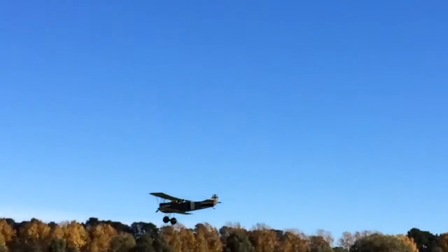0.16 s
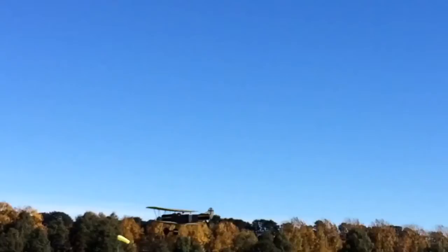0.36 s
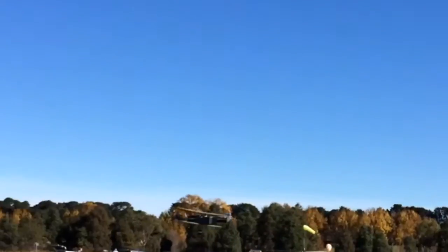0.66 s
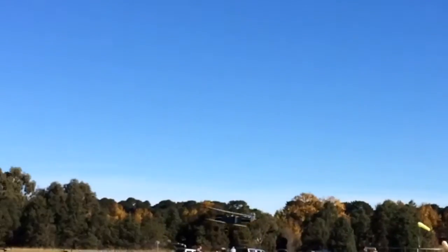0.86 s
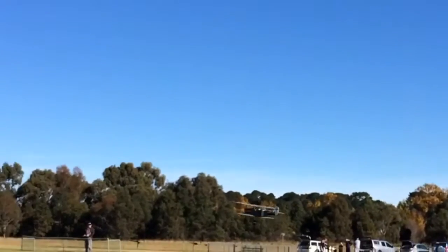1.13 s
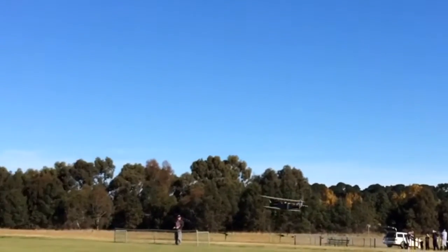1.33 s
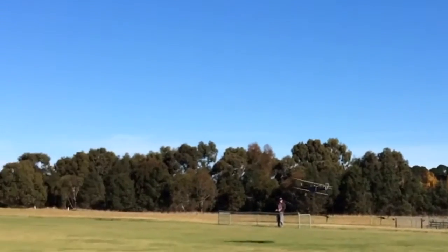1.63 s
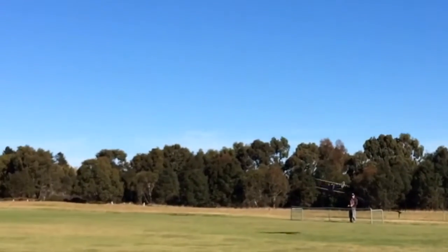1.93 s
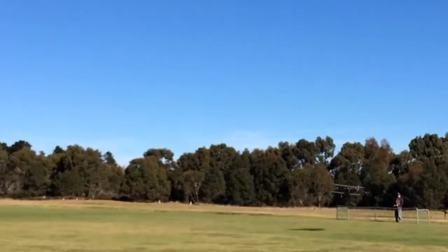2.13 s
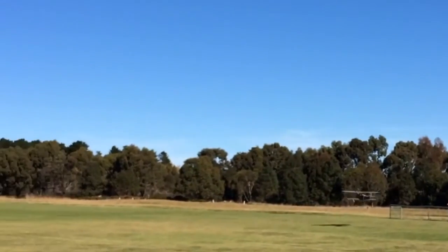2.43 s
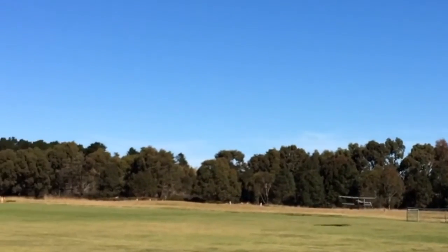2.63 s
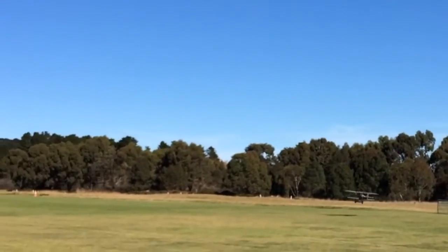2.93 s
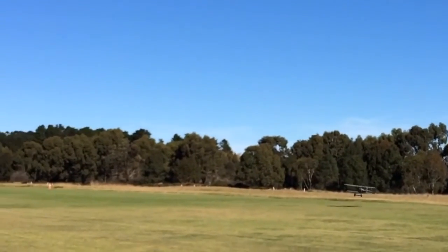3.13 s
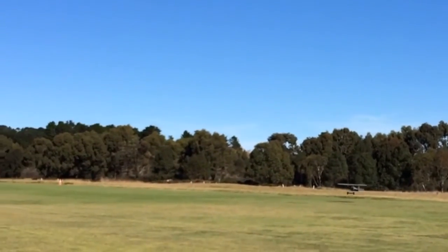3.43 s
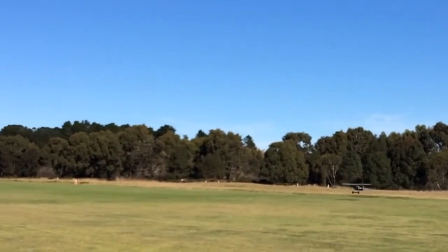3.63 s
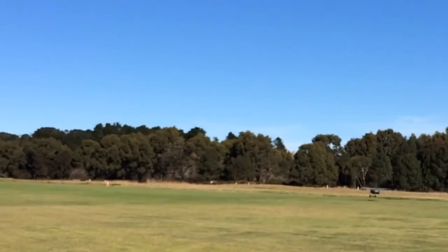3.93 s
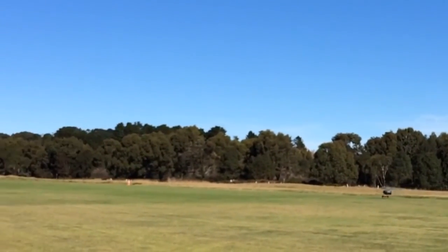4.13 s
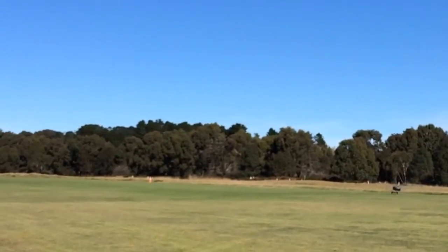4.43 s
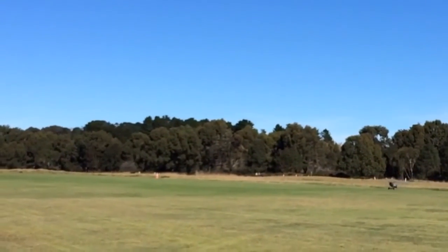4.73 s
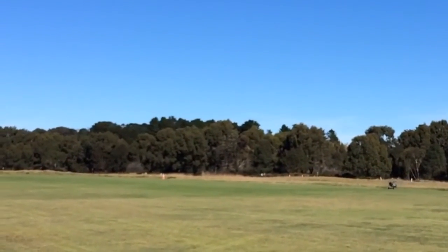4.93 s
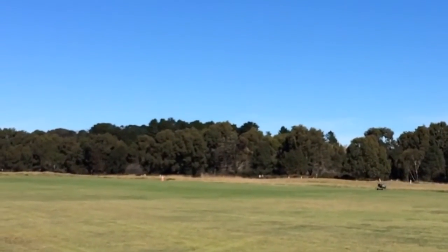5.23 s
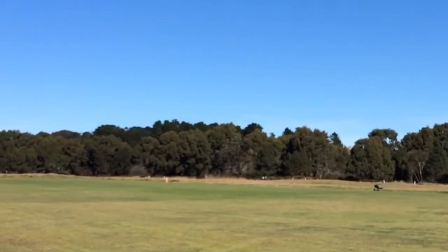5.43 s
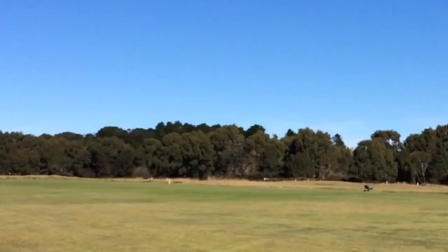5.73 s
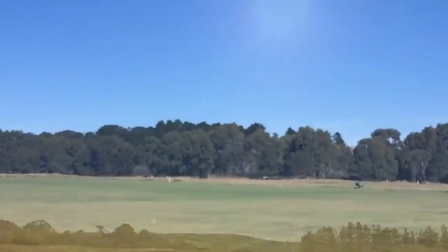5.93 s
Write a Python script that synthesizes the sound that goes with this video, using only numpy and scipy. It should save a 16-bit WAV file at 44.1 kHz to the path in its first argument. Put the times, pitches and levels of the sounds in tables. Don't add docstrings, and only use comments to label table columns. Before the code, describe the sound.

A small electric model biplane hisses and whines past over an open field while a nearby little engine putters unevenly with a ticking tin rattle.

```python
import sys
import numpy as np
from scipy import signal
from scipy.io import wavfile

SR = 44100
rng = np.random.default_rng(int(sys.argv[2]) if len(sys.argv) > 2 else 0)


def volts_from_db(level):
    exponent = np.asarray(level, float) / 20
    return 10 ** exponent


def transcribe(u):
    v = np.clip(np.atleast_2d(u).T, -1, 1)
    q = np.round(v * 32767).astype(np.int16)
    wavfile.write(sys.argv[1], SR, q)


N = 267246
TIME_S = np.arange(N) / SR


def rms_one(x):
    return x / np.sqrt(np.mean(x ** 2) + 1e-20)


def in_time(rows):
    s, *columns = np.transpose(rows)
    return [np.interp(TIME_S, s, column) for column in columns]


def swells(rows):
    return sum(volts_from_db(db) * np.exp(-((TIME_S - s) / spread) ** 2) for s, db, spread in rows)


def drift(rate):
    r = np.exp(-80 * np.pi * rate / SR)
    white = rng.standard_normal(N // 40 + 2002)
    slow = signal.lfilter([1], [1, -2 * r, r * r], white)[2000:]
    return np.interp(np.arange(N) / 40, np.arange(len(slow)), rms_one(slow))


def ring(clicks, hz, t60):
    r = volts_from_db(-60 / (t60 * SR))
    w = 2 * np.pi * hz / SR
    return signal.lfilter([0, np.sin(w)], [1, -2 * r * np.cos(w), r * r], clicks + 1e-18)


def tone(hz):
    cycles = np.cumsum(np.broadcast_to(hz, N)) / SR
    return np.sqrt(2) * np.sin(2 * np.pi * (cycles + rng.random()))


def swell_and_die(t, rise):
    return (t / rise) ** 2 * np.exp(2 - 2 * t / rise)


def burst(length_s, hz, rise):
    t = np.arange(int(length_s * SR)) / SR
    return swell_and_die(t, rise) * np.cos(2 * np.pi * hz * (t - rise))


def add(out, s, wave):
    i = round(s * SR)
    out[i:i + len(wave)] += wave[:N - i]


def band_pass(x, low, high, order=2):
    return signal.sosfilt(signal.butter(order, [low, high], "band", fs=SR, output="sos"), x)


def coloured_noise(spectrum, patchy_db, flicker, shared):
    hz_at, db_at = np.transpose(spectrum)
    bands = round(3 * np.log2(hz_at[-1] / hz_at[0]))
    edges = np.geomspace(hz_at[0], min(hz_at[-1], .45 * SR), bands + 1)
    out, together = 0, drift(0.16)
    white = rng.standard_normal((2, N))
    for k, (low, high) in enumerate(zip(edges, edges[1:])):
        level_db = np.interp(np.log(low * high) / 2, np.log(hz_at), db_at)
        wander_db = patchy_db * (shared * together + drift(flicker))
        out = out + volts_from_db(level_db + wander_db) * band_pass(white[k % 2], low, high)
    return rms_one(out)


# t/s, level/dB
WIND = [(0.0, -46), (0.32, -50), (0.72, -55), (1.3, -53), (1.78, -49), (2.3, -50), (2.55, -45), (2.8, -48),
        (3.09, -52), (3.4, -47), (4.5, -49), (5.3, -45), (5.85, -42), (5.95, -41), (6.06, -42)]
# f/Hz, level/dB per Hz
WIND_COLOUR = [(18, -16), (40, -7), (70, -2), (120, -3), (200, -4), (260, -18.5), (320, -24.5), (450, -23)]


def wind():
    wind_db, = in_time(WIND)
    return volts_from_db(wind_db - 5.0) * coloured_noise(WIND_COLOUR, patchy_db=2.5, flicker=7.5, shared=0.3)


# t/s, level/dB, ground-echo dip or lift/dB
AIR = [(0.0, -55, 2), (0.49, -56.5, -6), (0.67, -55, -5), (.88, -55.5, -9), (1.05, -57, -3),
       (1.35, -57, -0.5), (3.39, -59, 3.5), (4.3, -58.5, 0.5), (4.8, -57.5, 3), (5.4, -57, -3),
       (5.92, -59, -2), (6.06, -54, 0.5)]
# f/Hz, level/dB per Hz
AIR_COLOUR = [(160, -22), (280, -8), (331, -8), (454, -6.5), (574, -9.5), (932, 0.5), (1510, -2.5),
              (2010, -6.5), (2620, -10), (3210, -16.5), (4330, -26), (5500, -28.5), (6910, -29),
              (8300, -28), (9650, -34.5), (15200, -31)]


def far_air():
    air_db, dip_db = in_time(AIR)
    air = coloured_noise(AIR_COLOUR, patchy_db=1.7, flicker=17.3, shared=0.033)
    air += (volts_from_db(dip_db) - 1) * signal.lfilter(*signal.iirpeak(1750, 3.0, fs=SR), air)
    return volts_from_db(air_db - 1.0) * air


# t/s, level/dB
ENGINE = [(0.0, -55), (0.19, -52), (0.33, -51), (0.55, -60), (0.7, -51), (0.93, -56), (1.15, -50.5),
          (1.69, -51.5), (1.76, -47), (2.22, -46), (2.57, -50), (2.82, -47.5), (3.079, -51), (3.47, -48),
          (5.13, -49.5), (5.82, -46), (5.85, -52)]
# t/s, turns done
TURNS = [(0.0, 0.25), (0.75, 18.006), (1.5, 35.876), (2.5, 59.828), (3.5, 83.722), (4.25, 101.584),
         (5.0, 119.362), (5.5, 131.145), (6.06, 144.285)]
# start/share of a turn, height, f/Hz, rise/s
PUFFS = [
    (.638, .0056, 83.6, .0155),
    (.282, -.0081, 138.4, .0128),
    (.238, -.0038, 225.7, .013),
    (.14, .0014, 180, .015),
]
PUFF_DB = [2.9, 1.85, 1.95, 2.5]
# first t/s, last t/s, first and last level/dB in place of the soft silencer
HARD = [(.2, .2, 6, 6), (.67, .75, 12, 7), (1.46, 1.55, 5, 10), (1.59, 1.59, 12, 12),
        (1.8, 1.8, 12.5, 12.5), (1.92, 1.92, 10, 10), (2.05, 2.05, 10, 10), (2.26, 2.42, 4, 18),
        (2.47, 2.47, 9, 9), (2.97, 2.97, 13, 13), (3.47, 3.64, 9, 13), (3.72, 3.72, 7, 7),
        (3.93, 4.35, 11.5, 8), (4.44, 4.52, 9, 12.5), (4.6, 4.69, 9.5, 6), (4.73, 4.98, 9, 10.5),
        (5.03, 5.2, 11.5, 9), (5.24, 5.41, 9.5, 9.5), (5.37, 5.54, 10.5, 9), (5.58, 5.66, 5.5, 11.5),
        (5.71, 5.79, 7, 8)]
SILENCER_EVEN_DB, SILENCER_STEADY = -48.5, 0.37


def engine():
    s, turns = np.transpose(TURNS)
    count = np.arange(-1, int(turns[-1]) + 1)
    level_db = np.interp(np.interp(count, turns, s), *np.transpose(ENGINE))
    level = volts_from_db(level_db + 46.0)
    scatter_db = rng.standard_normal((len(count), len(PUFFS))) * [2.2, 1.5, 0.34, 1.5] + PUFF_DB
    for first, last, first_db, last_db in HARD:
        first_turn, last_turn = np.interp([first, last], s, turns)
        fired = np.arange(round(first_turn), round(last_turn) + 1, 2)
        scatter_db[fired, 0] = np.linspace(first_db, last_db, len(fired))
    scatter_db[:, 0] -= SILENCER_STEADY * (level_db - SILENCER_EVEN_DB)
    out = np.zeros(N)
    for (share, height, hz, rise), puff_db in zip(PUFFS, scatter_db.T):
        for turn, gain in zip(count + share, level * volts_from_db(puff_db)):
            if turns[0] < turn < turns[-1]:
                add(out, np.interp(turn, turns, s), gain * height * burst(0.14, hz, rise))
    return out


# t/s, level/dB
SLIP = [(0.0, -63), (.15, -60.5), (.2, -64), (.27, -60), (.36, -61.5), (.44, -62), (0.59, -60.5),
        (0.635, -57.5), (0.69, -59.5), (.8, -64.5), (0.93, -70.5), (0.97, -76), (1.09, -69.5), (1.17, -77),
        (2.4, -80.5)]
# f/Hz, level/dB per Hz
SLIP_COLOUR = [(470, -20), (800, -8), (916, 0), (1370, -18), (1650, -2), (2170, -37), (2810, -14),
               (3100, -10.5), (5070, -9.5), (6320, -9), (7640, -9.5), (8870, -11.5), (11700, -15),
               (15200, -21.5)]
# t/s, lag/ms
GROUND_LAG = [(0, 4), (1.6, 1.43)]


def slipstream():
    slip_db, = in_time(SLIP)
    lag_ms, = in_time(GROUND_LAG)
    hiss = coloured_noise(SLIP_COLOUR, patchy_db=1.5, flicker=18, shared=0.27)
    hiss = hiss * volts_from_db(0.62 * drift(57)) * (1 + 0.3 * tone(124))
    hiss += 0.5 * np.interp(np.arange(N) - lag_ms * SR / 1000, np.arange(N), hiss)
    return volts_from_db(slip_db + 1.5) * hiss


# t/s, level/dB, spread/s
WHINE = [(0, -70, .08), (.15, -69, .03), (.36, -74, .03), (.56, -76, .03), (.7, -77, .04), (.9, -89, 0.043),
         (1.2, -78.5, 0.35), (1.6, -90, 0.099), (1.77, -80, 0.044), (2.04, -73.5, 0.15), (2.49, -85, 0.1),
         (3.21, -92, 0.12), (4.3, -92, .15), (4.78, -93.5, 0.11)]
# t/s, level/dB, spread/s
INSECT_THROB = [
    (1.119, -87, 0.16),
    (1.58, -81, 0.091),
    (1.8, -78, 0.12),
    (2.15, -86, .12),
    (4.45, -96, 0.11),
]
THROBS_PER_S = 54


def controller_whine():
    hz = 7870 + 201.3 * np.exp(-TIME_S / 0.6)
    main = swells(WHINE) * volts_from_db(2.2 * drift(13)) * tone(hz + 6 * drift(53))
    throb = 1 + 0.33 * tone(THROBS_PER_S)
    return main + swells(INSECT_THROB) * throb * tone(hz + 35 * drift(50))


# multiple of motor pitch, t/s, level/dB, spread/s
MOTOR = [(3, 0.019, -59.5, 0.18), (4, 0.038, -62.5, 0.078), (3.92, 0.38, -64.5, 0.11),
         (3.92, 0.56, -64, 0.043), (5, 0.082, -58.5, 0.043), (5, 0.32, -64, 0.16), (5, 0.76, -61, 0.14),
         (5, 0.94, -69, 0.083), (4.6, 0.076, -63, .03), (4.6, 0.25, -65, 0.078), (6, 0.66, -68, 0.087),
         (5.86, 1.07, -63, 0.079), (2, 0.28, -64, 0.12), (2, 0.27, -65, 0.054), (3, 0.253, -59, 0.04)]


def motor_hum(prop_hz):
    motor_hz = 0.554 * prop_hz
    out = np.zeros(N)
    for multiple, *swell in MOTOR:
        waver = volts_from_db(-4.0 + 1.5 * drift(35))
        out += swells([swell]) * waver * tone(multiple * motor_hz + 6 * drift(30))
    return out


# t/s, f/Hz, level/dB
PROP = [(0, 802.6, -64), (.24, 807, -64.5), (.3, 813, -72), (.44, 806, -79), (.5, 809, -63), (.6, 806, -67),
        (.68, 803, -60.5), (.8, 765, -63.5), (.95, 745, -64.5), (1.2, 711, -70), (1.45, 670, -76),
        (1.6, 656, -100)]


def plane():
    prop_hz, prop_db = in_time(PROP)
    propeller = volts_from_db(prop_db) * tone(prop_hz + 5 * drift(28))
    shimmer = volts_from_db(1.0 * drift(24))
    return slipstream() + shimmer * (propeller + controller_whine() + motor_hum(prop_hz))


# t/s, f/Hz, level/dB
RUSH = [
    (0, 802, -69),
    (.25, 866, -71),
    (.55, 1055, -67),
    (.8, 999, -60.5),
    (1.1, 1079, -65),
    (1.45, 1170, -64.5),
    (2, 1260, -73),
    (2.5, 1257, -80),
]
# t/s, level/dB, spread/s
SURGE = [
    (.645, -63, .03),
]
# t/s, level/dB, spread/s
WIRES = [
    (.3, -70.5, 0.24),
    (.58, -72, 0.092),
]


def airframe():
    rush_hz, rush_db = in_time(RUSH)
    rush = volts_from_db(rush_db + 2.9 * drift(40)) * tone(rush_hz + 89.65 * drift(119.9))
    surge = rms_one(band_pass(rng.standard_normal(N), 2200, 7200))
    whistle = volts_from_db(4.0 * drift(40)) * tone(6370 + 120 * drift(8) + 350 * drift(300))
    return rush + swells(SURGE) * surge + swells(WIRES) * whistle


# t/s, peak level/dB, bright tick level/dB
RATTLE = [(2.178, -42.5, -74), (2.3342, -41, -72), (2.694, -38.5, -71), (2.7305, -40.5, -73),
          (2.7485, -42, -79), (2.903, -49, -78), (3.0499, -43, -84), (3.097, -44, -72), (3.1688, -41, -80),
          (3.1896, -44, -80), (3.2013, -41.5, -79), (3.48, -44, -76), (3.8292, -46, -74),
          (3.9927, -41, -74), (4.015, -52, -74), (2.535, -52, -77), (4.461, -54, -80), (4.698, -54, -81),
          (4.795, -52, -75), (5.17, -57, -86), (1.08, -55, -80), (5.5472, -40.5, -86), (4.041, -44.5, -80),
          (4.188, -40.5, -77), (4.2183, -38, -75), (4.245, -38, -79), (4.323, -43, -85), (4.5745, -42, -83),
          (4.5934, -38.5, -88), (4.718, -41.5, -74), (4.783, -40, -80), (4.9307, -40.5, -76),
          (4.948, -42, -81), (5.218, -45, -75), (5.2788, -40, -75), (5.363, -43, -71.5), (5.524, -43, -72),
          (5.8402, -39, -75)]
# t/s, peak level/dB
TAPS = [(0.9991, -53), (1.041, -49), (1.428, -53), (1.8477, -60), (2.0437, -56), (2.277, -48.5),
        (2.7624, -55), (2.8564, -51), (2.919, -48), (2.9703, -53), (3.02, -50), (3.122, -50), (3.5384, -48),
        (3.5885, -60), (3.9389, -51), (4.0612, -57), (4.1757, -59), (4.228, -49), (4.5325, -47),
        (4.5535, -61), (4.7572, -47), (4.889, -45), (5.012, -50), (5.058, -53), (5.084, -61), (5.256, -47),
        (5.3442, -52), (5.732, -57), (5.7922, -47.5), (5.8774, -48)]
# t/s, level/dB
CHATTER = [(0, -72), (.85, -68), (1.05, -65.5), (3, -64.5), (6.06, -61.5)]
# f/Hz, level/dB, t60/s
TIN = [
    (2675, -2, 0.0077),
    (2545, -3.5, 0.007),
    (2227, -14, 0.057),
    (2170, -34, 0.039),
    (3200, -18, 0.029),
]


def rattle():
    chatter_db, = in_time(CHATTER)
    sizes = volts_from_db(chatter_db + 2.0 * np.minimum(rng.exponential(1, N), 3)) * rng.choice([-1, 1], N)
    knocks_per_s = 380 * volts_from_db(2.0 * drift(20))
    small = (rng.random(N) < knocks_per_s / SR) * sizes
    knocks = RATTLE + [(s, db + 5.5, db - 31.5) for s, db in TAPS]
    clear, ticks = np.zeros(N), np.zeros(N)
    fade = np.exp(-np.arange(400) / SR / 0.0099)
    for s, db, tick_db in knocks:
        add(clear, s, volts_from_db([db - 7.0]))
        add(ticks, s, volts_from_db(tick_db + 10.5) * rng.standard_normal(400) * fade)
    contact = burst(0.0046, 2657, rise=0.00047) / 12
    small = np.convolve(small, contact)[:N]
    clear = np.convolve(clear, contact)[:N]
    out = band_pass(ticks, 3200, 11000, order=1)
    for hz, db, t60 in TIN:
        out += volts_from_db(db) * ring(volts_from_db(1.8 * drift(48)) * small + clear, hz, t60)
    return out


def cricket_chorus():
    far = band_pass(rng.standard_normal(N), 8280 - 450, 8280 + 450)
    throb = volts_from_db(2.4 * tone(27.5 + 1.12 * drift(5.8)) + 1.2 * drift(2.2))
    return volts_from_db(-83.5) * rms_one(far * throb)


# t/s, height, f/Hz, rise/s
KNOCK = [(.2155, -.011, 140, .004), (.291, .009, 60, .011), (.3045, -.016, 150, .004),
         (.314, .009, 90, .006), (5.923, 0.035, 181, 0.0042), (5.9309, 0.044, 335, 0.0012),
         (5.9308, -0.078, 152, .003), (5.938, 0.025, 170, .004), (5.947, -0.028, 120, 0.0045),
         (5.957, 0.026, 75, .006), (5.978, 0.018, 110, .006), (6.011, 0.025, 130, .005),
         (6.022, 0.03, 140, .004), (6.0272, 0.052, 105, 0.0058), (6.04, 0.01, 297, 0.006),
         (6.05, -0.025, 110, .005)]
SNAP_S = 5.9212


def handling():
    out = np.zeros(N)
    add(out, SNAP_S, -0.043 * np.exp(-np.arange(800) / SR / 0.0015))
    rub = rms_one(band_pass(rng.standard_normal(6000), 250, 1300))
    add(out, SNAP_S + 0.017, volts_from_db(-54.5) * rub * np.exp(-np.arange(6000) / SR / 0.078))
    for s, height, hz, rise in KNOCK:
        add(out, s, height * burst(.12, hz, rise))
    return out


def stroke(hz):
    t, rise = np.arange(int(.04 * SR)) / SR, 0.0052
    sliding_hz = hz - 180 * (t / rise - 1) / 2
    return swell_and_die(t, rise) * np.sin(2 * np.pi * np.cumsum(sliding_hz) / SR)


# first stroke t/s, length/s, peak level/dB, f/Hz
CRICKET = [(1.276, .23, -64, 8040), (1.927, .05, -66, 8100), (2.327, .2, -67, 8100),
           (2.79, 0.19, -69, 8000), (3.276, 0.19, -65, 8100), (3.669, 0.27, -66.5, 7960),
           (3.883, .05, -72, 8400), (4.035, .08, -72, 8400), (4.106, .25, -66.5, 8010),
           (4.61, 0.15, -63.5, 7920), (4.942, 0.082, -70, 8400), (5.08, .2, -65, 8030),
           (5.551, 0.21, -64, 8000), (2.993, 0.13, -70, 8450), (3.112, 0.16, -70, 8000),
           (3.5, .07, -69, 8450), (4.389, .16, -77, 8500), (2.333, .2, -76, 8360),
           (5.474, 0.089, -66, 8400)]


def cricket():
    out = np.zeros(N)
    for s, length, db, hz in CRICKET:
        for late in np.arange(0, length, 0.0367):
            louder, higher = rng.standard_normal(2)
            stroke_db = db - 5.0 - 3.5 * (2 * late / length - 1) ** 2 + 1.5 * louder
            stroke_hz = hz + 1100 * late + 65 * higher
            add(out, s + late, volts_from_db(stroke_db) * stroke(stroke_hz))
    return out


# t/s, level/dB, spread/s, f/Hz, fall/Hz per s
BUZZ = (1.8, -79.5, .26, 5280, 300)
# t/s, level/dB, spread/s
BUZZ_NOTES = [
    (1.83, -79, 0.031),
    (1.99, -81, .02),
]


def insect_buzz():
    s, db, spread, hz, fall = BUZZ
    throb = volts_from_db(2.2 * drift(60) + 2.5 * tone(THROBS_PER_S))
    buzz = swells([(s, db, spread)]) * throb * tone(hz - fall * (TIME_S - s) + 150 * drift(400))
    return buzz + swells(BUZZ_NOTES) * tone(0.99 * hz + 70 * drift(150))


# t/s, level/dB, spread/s
GRASS = [
    (4.98, -84, 0.082),
    (5.18, -77, 0.13),
]


def grass():
    grains = rng.standard_normal(N) * volts_from_db(3.0 * drift(70))
    return swells(GRASS) * rms_one(band_pass(grains, 5000, 14000))


def scene():
    background = wind() + far_air() + cricket_chorus() + grass()
    machines = engine() + plane() + airframe() + rattle()
    return (background + machines + handling() + cricket() + insect_buzz())[None]


def top_cut(x):
    return signal.sosfilt(signal.butter(12, 15300, fs=SR, output="sos"), x)


def record(dry):
    mix = signal.sosfilt(signal.cheby2(12, 50, 15900, fs=SR, output="sos"), dry)
    return top_cut(mix)


dry = scene()
out = record(dry)
transcribe(out)
```